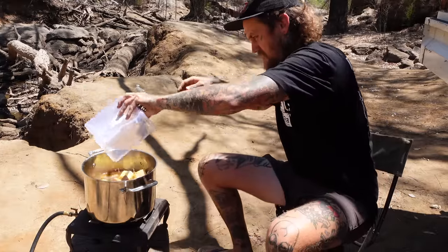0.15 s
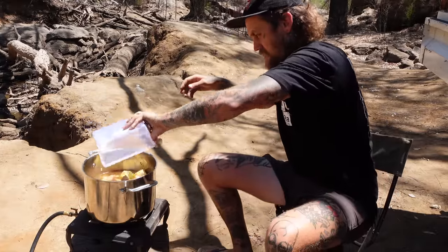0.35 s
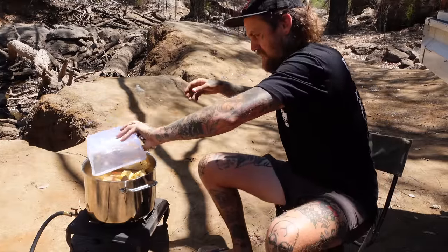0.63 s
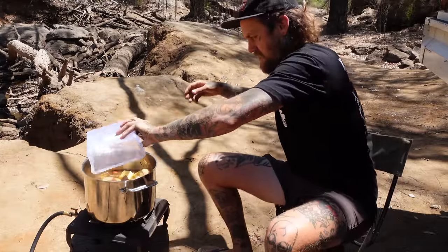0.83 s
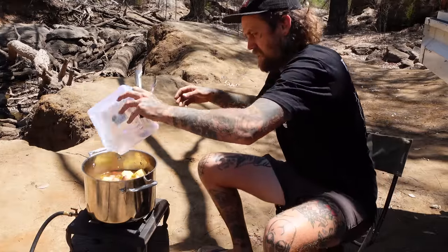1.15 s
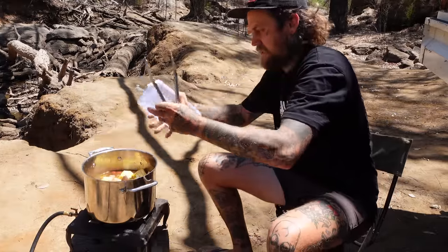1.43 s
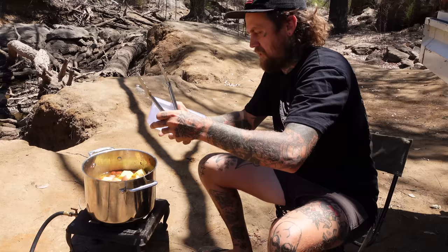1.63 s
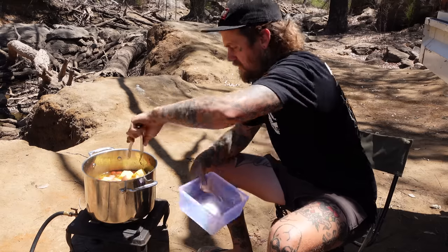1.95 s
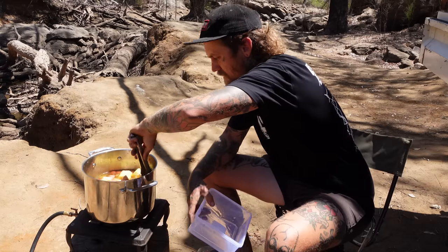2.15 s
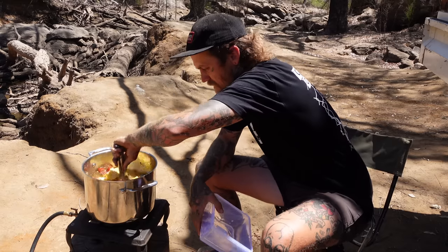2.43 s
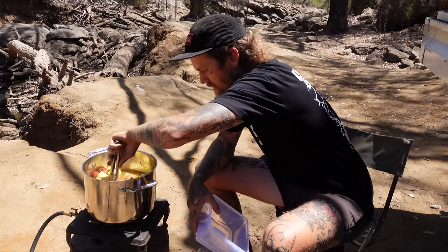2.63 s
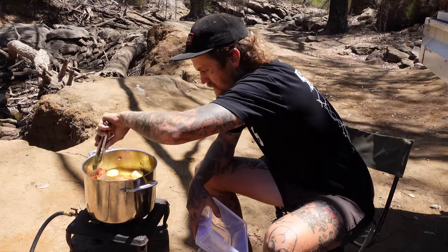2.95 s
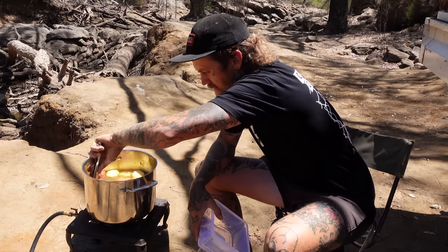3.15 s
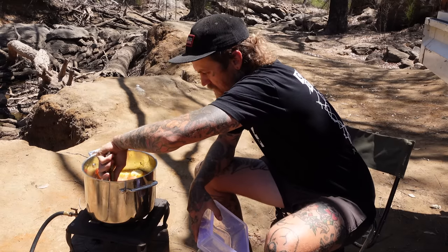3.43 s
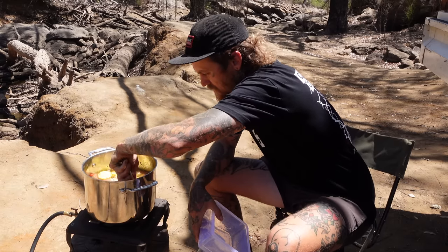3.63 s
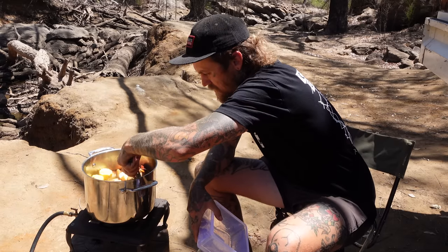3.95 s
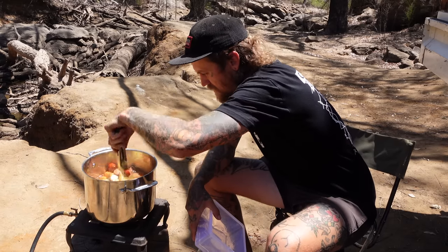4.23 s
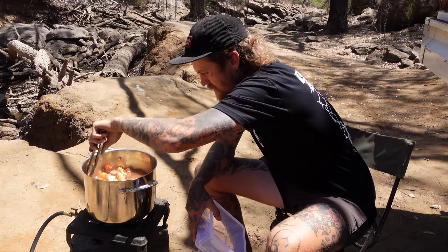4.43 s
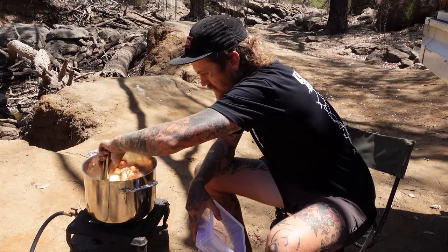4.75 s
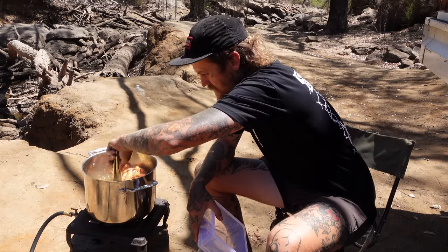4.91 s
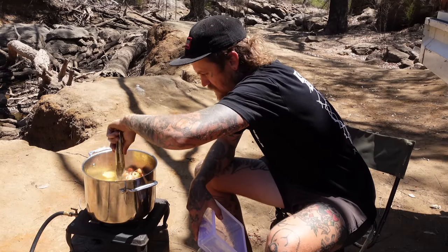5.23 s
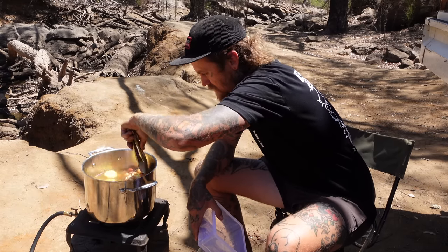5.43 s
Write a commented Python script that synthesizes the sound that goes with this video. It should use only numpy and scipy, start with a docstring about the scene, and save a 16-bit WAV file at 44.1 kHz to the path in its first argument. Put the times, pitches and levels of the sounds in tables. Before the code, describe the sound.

Potatoes and corn rattle lightly out of a plastic tub and drop into a steel pot of water with a few quick plops and short ringing knocks. Steel tongs then clack against the pot now and then as they stir the wet food, which swishes and crackles with small bubbles. A gas burner rumbles softly underneath, and a distant insect ticks steadily. The pot is close and straight ahead, outdoors with little echo.

```python
"""Potatoes and corn tumble from a plastic tub into a steel pot of water on a gas burner, outdoors.
Each piece cracks on the wall, rings the pot and plops as it drags air under. Steel tongs then
clack against the pot and stir the wet food, which swishes and crackles with tiny bubbles.
The flame rumbles softly under the pot, and an insect ticks six times a second in the trees."""
import sys
import numpy as np
from scipy import signal
from scipy.fft import rfft, irfft, next_fast_len
from scipy.io import wavfile
from scipy.ndimage import uniform_filter1d

SR = 44100
rng = np.random.default_rng(int(sys.argv[2]) if len(sys.argv) > 2 else 0)


def int16_out(signal):
    """Quantize to a 16-bit WAV file."""
    q = np.round(np.clip(np.atleast_2d(signal).T, -1, 1) * 32767)
    wavfile.write(sys.argv[1], SR, q.astype(np.int16))


N = 246078
TIME = np.arange(N) / SR  # scene clock [s]
AGE = np.arange(SR // 4) / SR  # time since the start of one short sound [s]


def falling_food(swell_s=0.0035, contact_s=0.00031, spot_db=1.7, detune=0.0053):
    """Each piece cracks on the wall, rings the pot and drags down an air pocket that plops shut."""
    # landings (the row at 0.6485 s is a second swell of the air pocket of the piece before it): (time [s], ring
    # [dB], hardness [Hz], crack [dB], plop [dB], plop pitch [Hz], life of the air pocket [s])
    landings = [(0.5977, -20.5, 7000, -24.5, -71.5, 470, .01), (0.6373, -16, 830, -26.5, -5.5, 464, 0.0088),
                (0.6485, -26, 930, -51, -14.5, 467, 0.014), (0.7057, -34.5, 990, -56, -31, 470, 0.0096),
                (0.9785, -25, 850, -37.5, -15.5, 483, 0.012), (1.681, -43.5, 600, -60, -36, 343, 0.006)]
    # modes of the filled pot: (frequency [Hz], level [dB], t60 [s])
    pot_modes = [(264.7, 2.5, 0.096), (309, 1, 0.088), (350, -5.5, 0.025), (592, 3.5, 0.034),
                 (770, -4.5, 0.07), (1068, 0, 0.055), (1148, -10.5, 0.055), (1197, -5.5, 0.045),
                 (1501, -1, 0.07), (1647, -5.5, 0.021), (1807, -12.5, 0.094), (2136, -2, 0.026),
                 (2606, -6, 0.069), (3490, -6.5, 0.04), (6390, -4, 0.03), (6586, -2.5, 0.049),
                 (6730, -1, .025), (7160, -1.5, 0.052), (8990, -20, .045), (9950, -11.5, 0.071)]
    out = np.zeros(N)
    for start, ring_db, hardness_hz, crack_db, plop_db, plop_hz, life_s in landings:
        # every spot on the wall rings a little differently
        modes = [(hz * (1 + detune * rng.standard_normal()), db + spot_db * rng.standard_normal(), t60)
                 for hz, db, t60 in pot_modes]
        wall = ring(modes, hardness_hz) * fade_in(contact_s)
        impact = crack(t60=0.043, tilt_db=np.log2(hardness_hz / 1000))
        pocket = (1 - np.exp(-(AGE / swell_s) ** 2)) * np.exp(-(AGE / life_s) ** 2)
        plop = np.sin(2 * np.pi * plop_hz * AGE) * pocket
        add(out, start, amp(ring_db) * wall + amp(crack_db) * impact + amp(plop_db) * plop)
    return out


def ring(modes, hardness_hz=None):
    """Struck steel rings in decaying modes; a blow favours those near the pitch of its hardness."""
    out = np.zeros(len(AGE))
    for k, (hz, db, t60) in enumerate(modes):
        share = 1 / (hz / hardness_hz + hardness_hz / hz) if hardness_hz else 1
        out += share * decay(t60, db) * np.sin(2 * np.pi * hz * AGE + k * k)
    return out


def crack(t60, tilt_db, low_cut_hz=260, treble_hz=9000, treble_life=0.81):
    """A dense burst at the moment of contact; treble dies first, and small things radiate no bass."""
    # colour of a hard contact: (frequency [Hz], level [dB])
    colour = [(80, -42), (400, -7), (900, -5.5), (1500, -5), (2400, 4), (3100, 2), (4500, 8), (7000, 2.5),
              (8800, -2.5), (10000, -12), (12000, -11.5), (16000, -31.5)]
    burst = noise_burst(colour, tilt_db)
    treble = irfft(rfft(burst) * (np.fft.rfftfreq(len(AGE), 1 / SR) > treble_hz), len(AGE))
    damped = (burst - treble) * decay(t60) + treble * decay(t60 * treble_life) / np.sqrt(treble_life)
    return signal.lfilter(*signal.butter(2, low_cut_hz, "high", fs=SR), damped)


def contact(tilt_db, base_t60, ring_db, detune=0.011, spread_s=0.0032):
    """A crack, shorter when it is brighter, and a ring of steel whose modes shift a little each time."""
    # modes of tongs and rim: (frequency [Hz], level [dB], t60 [s])
    steel_modes = [(399.6, -23, 0.084), (737, -11, 0.047), (1645, -17.5, .03), (2121, 6.5, 0.025),
                   (3620, -11.5, 0.047), (4430, -16.5, 0.016), (4615, -1.5, 0.03), (5040, -12, 0.025),
                   (6640, -2, 0.036), (7780, 16.5, 0.0081), (8860, -3.5, 0.031)]
    modes = [(hz * (1 + detune * rng.standard_normal()), db, t60) for hz, db, t60 in steel_modes]
    steel = ring(modes) * fade_in(spread_s)
    crack_t60 = base_t60 * 2 ** (-tilt_db / 15.5)  # 15.5 dB/octave brighter dies twice as fast
    return crack(crack_t60, tilt_db) + amp(ring_db) * steel


def dry_knocks():
    """Short dry knocks and ticks: food leaving the tub, a hit on the pot, an insect tick."""
    # knocks and ticks: (time [s], level [dB], brightness [dB/octave])
    knocks = [(0.05, -33, 2), (0.057, -34.5, 19), (0.0775, -31, 28), (.108, -43, 2), (.1297, -51, -11),
              (.1395, -50, 5), (0.1776, -47, 0), (0.1872, -41.5, -5), (0.198, -43.5, 6), (0.3423, -45.5, 2),
              (0.5, -44, -10), (0.616, -32.5, -4), (1.373, -47, 5), (1.7646, -45.5, -9)]
    out = np.zeros(N)
    for start, db, tilt_db in knocks:
        add(out, start, amp(db) * contact(tilt_db, base_t60=0.051, ring_db=-22.5))
    return out


def tongs(grip_db=-5):
    """The tongs clack on the pot; the grip holds their ring down."""
    # clacks: (time [s], level [dB], brightness [dB/octave], ring before the grip [dB])
    clacks = [(2.1447, -25.5, 3.5, 1.5), (2.162, -38, 0, 5), (2.2342, -37.5, -3, -2), (2.372, -34, 4, -3.5),
              (2.4635, -43.5, 2, -13), (3.0865, -27.5, 2.5, -1.5), (3.2554, -42.5, 7.5, -5),
              (3.4123, -38.5, 2, -8), (3.6391, -35.5, -0.5, 1), (3.658, -41, -6.5, -14),
              (4.481, -21.5, 7.5, -0.5), (4.4962, -34.5, 7, -16), (5.5156, -26, 7, 6.5),
              (5.5330, -33.5, -2, 2.5)]
    out = np.zeros(N)
    for start, db, tilt_db, ring_db in clacks:
        add(out, start, amp(db) * contact(tilt_db, base_t60=0.037, ring_db=ring_db + grip_db))
    return out


def rasps(attack_s=0.00063, skirt_db=-33.5):
    """Short pitched rasps: tong scrapes, wet crackles, small bubble pops and a tub squeak."""
    # rasps: (time [s], level [dB], pitch [Hz], t60 [s])
    cues = [(0.0496, -25, 4360, 0.027), (3.1767, -40.5, 6430, 0.017), (3.4985, -41.5, 4440, 0.029),
            (3.5593, -40, 4140, 0.041), (3.5808, -29, 5580, 0.016), (3.6047, -39, 4560, 0.027),
            (3.624, -41.5, 5040, 0.063), (3.865, -45.5, 4700, 0.028), (4.701, -46, 5220, 0.016),
            (5.002, -44.5, 4100, .02), (5.093, -45.5, 4000, 0.032)]
    out = np.zeros(N)
    for start, db, hz, t60 in cues:
        rasp = noise_burst([(hz / 2, skirt_db), (hz, 0), (hz * 2, skirt_db)])
        add(out, start, fade_in(attack_s) * decay(t60, db) * rasp)
    return out


def stirring(fizz_db=-1, clump_db=2.2):
    """Wet food swishes and crackles in uneven clumps as it is shoved around."""
    # colour of the wet food: (frequency [Hz], level [dB])
    colour = [(40, -26.5), (300, 3.5), (1200, 6), (3000, 7), (5500, 6.5), (9000, 1), (16000, -30)]
    swish = amp(fizz_db) * fizz() + rng.standard_normal(N)
    clumps = amp(clump_db * wander(samples=260))
    return coloured(swish * clumps, colour) * shoving()


def fizz(pitches=20, pops_per_s=1900, cycles=4.5, spread_db=3.7):
    """Tiny bubbles burst at random, each a blip that swells softly and dies."""
    out = np.zeros(N)
    age = AGE[:SR // 30]
    for hz in np.geomspace(600, 10000, pitches):
        bursts = rng.random(N) < pops_per_s / pitches / SR
        sizes = np.minimum(rng.exponential(1, N), 4)
        progress = np.pi * hz * age / cycles
        blip = np.sin(2 * np.pi * hz * age) * progress * np.exp(-progress) * hz
        out += signal.oaconvolve(bursts * amp(spread_db * sizes), blip)[:N]
    return unit_rms(out)


def shoving(attack_s=0.0032, release_s=0.054):
    """Envelope of the sliding food: each shove starts quickly, holds and settles."""
    # shoves: (start [s], length [s], level [dB])
    shoves = [(0, 0.19, -57), (0.187, 0.13, -61), (0.66, 0.078, -60.5), (1.766, 0.05, -57.5),
              (2.261, 0.23, -57), (2.608, 0.16, -61), (3.149, .12, -56.5), (3.331, 0.25, -54),
              (3.532, 0.056, -54.5), (3.623, 0.035, -50.5), (3.749, 0.15, -61), (4.495, 0.019, -51.5),
              (4.897, 0.21, -62)]
    power = np.zeros(N)
    for start, length, db in shoves:
        attack = np.clip((TIME - start) / attack_s, 0, 1)
        release = np.exp(-np.maximum(TIME - start - length, 0) / release_s)
        power += (amp(db) * attack * release) ** 2
    return np.sqrt(power)


def bubbles(open_s=0.0009, squelch_db=-9):
    """A few large bubbles, stirred up, squelch and ring out with rising pitch."""
    # single bubbles: (time [s], level [dB], starting pitch [Hz], t60 [s])
    pops = [(.247, -37.5, 1720, 0.017), (2.425, -40, 1260, 0.02), (4.8452, -33.5, 1350, 0.014),
            (4.8496, -40, 967, 0.052), (4.8445, -41, 2130, 0.029), (4.876, -35, 2330, 0.03),
            (4.915, -48.5, 1195, 0.065), (4.986, -43.5, 1530, 0.018)]
    out = np.zeros(N)
    for start, db, hz, t60 in pops:
        squelch = amp(squelch_db) * noise_burst([(hz / 4, -25), (hz, 0), (hz * 4, -32)])
        tone = np.sin(2 * np.pi * hz * AGE * (1 + 2 * AGE))
        add(out, start, fade_in(open_s) * decay(t60, db) * (tone + squelch))
    return out


def burner(flutter_db=0.7):
    """A fluttering flame rumbles, and the pot's air modes swell to a hollow roar, over steady hiss."""
    # fader rides of the flame's rumble and the pot's roar: (time [s], level [dB])
    rumble_ride = [(0, -56.5), (.45, -57), (.87, -59), (1.1, -52.5), (1.45, -55), (1.8, -60.5), (2.85, -60),
                   (3.15, -64), (4.1, -64.5), (4.52, -61), (5.0, -67), (5.58, -64.5)]
    roar_ride = [(0, -52.5), (.22, -53), (.42, -63), (.9, -55), (1.13, -48), (1.46, -51.5), (1.62, -57),
                 (1.84, -60), (1.92, -50.5), (2.32, -63.5), (2.39, -55.5), (2.55, -63.5), (2.8, -62.5),
                 (4, -65.5), (5.58, -68)]
    # colours of the flame and the background hiss: (frequency [Hz], level [dB])
    rumble_colour = [(25, -27), (40, -42.5), (70, -12), (120, -4), (190, 1), (290, -1), (400, -8.5),
                     (700, -13.5), (4000, -73)]
    hiss_colour = [(40, -24), (700, 0), (2200, 0), (3300, -1.5), (4400, 1.5), (5500, -2.5), (7000, -.5),
                   (8500, -2), (9700, -10), (13000, -14.5), (16000, -18)]
    # air modes of the pot: (frequency [Hz], half-width [Hz], level [dB])
    air_modes = [(566, 88, 10.5), (754, 115, 9), (1420, 100, 1), (2060, 176, -6), (2630, 110, -8)]

    def resonance(hz):
        peaks = [amp(db) / (1 + ((hz - centre) / width) ** 2) for centre, width, db in air_modes]
        return np.linalg.norm(peaks, axis=0)

    flutter = amp(flutter_db * wander(samples=1000))
    rumble = fader(rumble_ride) * wide_noise(lambda hz: amp(curve_at(rumble_colour, hz)))
    roar = fader(roar_ride) * wide_noise(resonance)
    hiss = amp(-61.2) * wide_noise(lambda hz: amp(curve_at(hiss_colour, hz)))
    return flutter * (rumble + roar) + hiss


def insect(gap_s=0.165, chirp_hz=7500, rise_hz=900, rise_s=0.016, uneven_db=1.3):
    """Each tick, never quite alike, snaps and chirps upward, smeared by echoes from the trees."""
    # colour of a tick: (frequency [Hz], level [dB])
    colour = [(1000, -48), (3500, -20.5), (4500, -20), (5600, -10.5), (6800, -2.5), (7700, 6), (8600, 3.5),
              (9300, -17.5), (14000, -34.5)]
    # fader ride of the insect: (time [s], level [dB])
    ride = [(.5, -42.5), (.9, -47), (5.5, -48.5)]
    out = np.zeros(N)
    snap_and_echo = np.hypot(decay(t60=0.018), decay(t60=0.5, db=-12))
    pitch = chirp_hz + rise_hz * fade_in(rise_s)
    chirp = np.sin(2 * np.pi * np.cumsum(pitch) / SR) * decay(t60=0.18, db=-11)
    for start in np.arange(0.0125, N / SR, gap_s):
        rasp = noise_burst([(200, -6), (800, -46)])  # slow noise roughens the chirp
        tick = snap_and_echo * noise_burst(colour) + chirp * rasp
        add(out, start, amp(uneven_db * rng.standard_normal()) * tick)
    return out * fader(ride)


def clearing(x, near_db=-16, far_db=-26, low_cut_hz=700, width_db=-19):
    """The stove and the trees scatter weak echoes; low notes pass around them."""
    near = rng.standard_normal(len(AGE)) * decay(t60=0.27) * (AGE > 0.004)
    far = rng.standard_normal((2, len(AGE))) * decay(t60=0.53) * (AGE > 0.008)
    echo = amp(near_db) * near / np.linalg.norm(near) + amp(far_db) * far / np.linalg.norm(far[0])
    treble = signal.lfilter(*signal.butter(1, low_cut_hz, "high", fs=SR), x)
    # a phase shift brings the treble to one ear a little sooner
    side = amp(width_db) * signal.hilbert(treble, next_fast_len(N)).imag[:N]
    return x + np.array([-side, side]) + signal.fftconvolve(treble[None], echo, axes=1)[:, :N]


def wide_noise(gain_at):
    """A stereo noise bed with a given gain over frequency, much alike in both ears."""
    # stereo image of the background: (frequency [Hz], left-right likeness [0..1])
    image = [(25, 0.35), (60, 1), (150, 0.5), (300, 0.67), (8000, 0.9)]
    hz = np.fft.rfftfreq(2 ** 18, 1 / SR)
    likeness = curve_at(image, hz)
    noise = rng.standard_normal((4, len(hz)))
    mid = np.sqrt(1 + likeness) * (noise[0] + 1j * noise[1])
    side = np.sqrt(1 - likeness) * (noise[2] + 1j * noise[3])
    return unit_rms(irfft(np.array([mid + side, mid - side]) * gain_at(hz))[:, :N])


def noise_burst(colour, tilt_db=0):
    """A quarter second of coloured noise."""
    return coloured(rng.standard_normal(len(AGE)), colour, tilt_db)


def coloured(x, colour, tilt_db=0):
    """Equalises x to a colour, tilted by some dB per octave, at rms 1."""
    hz = np.fft.rfftfreq(len(x), 1 / SR)
    eq_db = curve_at(colour, hz) + tilt_db * np.log2(hz / 1000 + 0.5)
    return unit_rms(irfft(rfft(x) * amp(eq_db), len(x)))


def curve_at(points, hz):
    """Reads a curve on a log-frequency axis."""
    point_hz, values = np.transpose(points)
    return np.interp(np.log(hz + 1), np.log(point_hz), values)


def wander(samples):
    """A smooth random curve of rms 1 that changes over about this many samples."""
    return unit_rms(uniform_filter1d(uniform_filter1d(rng.standard_normal(N), samples), samples))


def fade_in(rise_s):
    """An exponential rise from 0 towards 1."""
    return 1 - np.exp(-AGE / rise_s)


def decay(t60, db=0):
    """An envelope that starts at db and falls 60 dB in t60 seconds."""
    return amp(db - 60 * AGE / t60)


def fader(ride):
    """Gain over the scene from a curve in dB."""
    return amp(np.interp(TIME, *np.transpose(ride)))


def amp(db):
    """Decibels to gain."""
    return 10 ** (np.asarray(db) / 20)


def unit_rms(x):
    """Scales to rms 1."""
    return x / np.sqrt(np.mean(x ** 2) + 1e-20)


def add(mix, start_s, sound):
    """Mixes a sound in at its start time."""
    part = mix[round(start_s * SR):][:len(sound)]
    part += sound[:len(part)]


def scene():
    """The pot straight ahead, the burner under it, the insect far off."""
    foreground = falling_food() + dry_knocks() + tongs() + rasps() + stirring() + bubbles()
    return clearing(foreground) + burner() + insect()


def record(dry):
    """A steep low-pass trims the very top of the treble."""
    low_pass = signal.firwin(401, cutoff=16300, window=("kaiser", 9), fs=SR)
    return signal.oaconvolve(dry, low_pass[None], "same")


dry = scene()
out = record(dry)
int16_out(out)
```